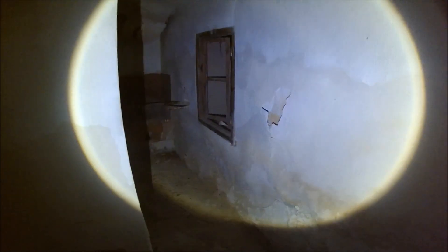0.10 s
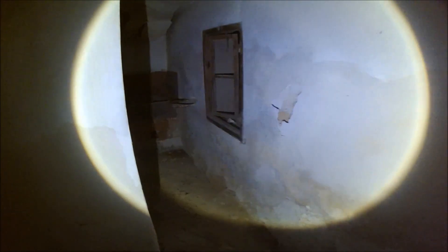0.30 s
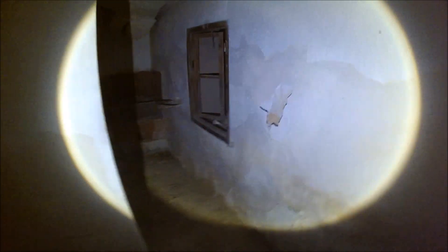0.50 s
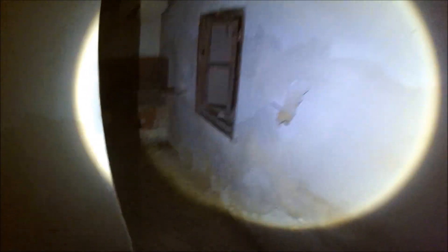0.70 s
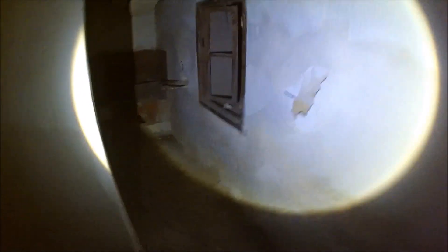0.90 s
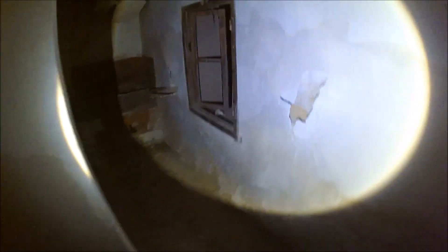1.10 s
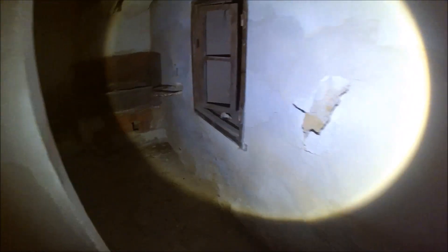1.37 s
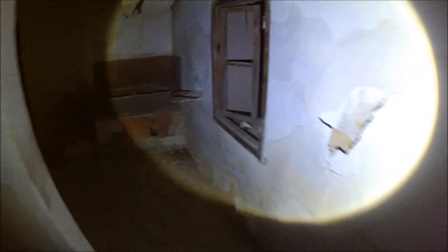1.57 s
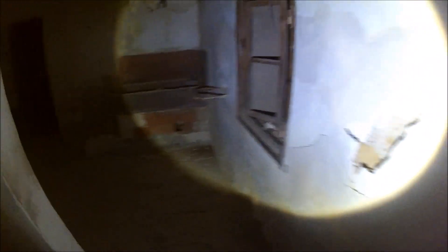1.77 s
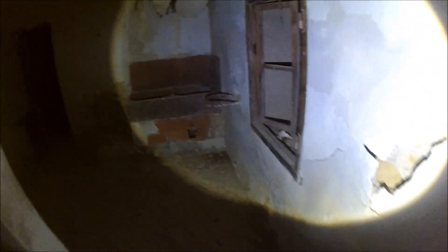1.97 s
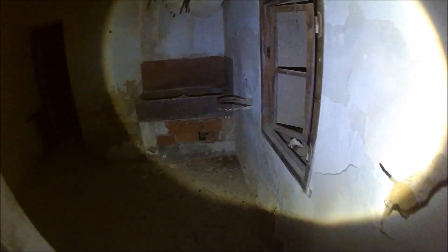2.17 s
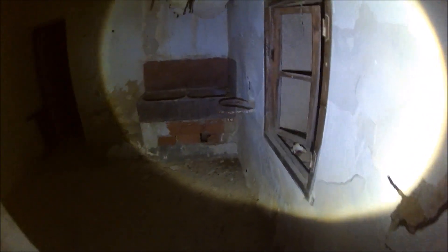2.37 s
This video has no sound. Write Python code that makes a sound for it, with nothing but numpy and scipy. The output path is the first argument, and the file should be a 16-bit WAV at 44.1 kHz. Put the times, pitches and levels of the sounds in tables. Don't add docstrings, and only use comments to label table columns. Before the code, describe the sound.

Footsteps on gritty rubble in a bare room. A small click at 0.1 s, then a loud sharp chip snap at 0.22; grinding and a soft heel from 0.4 to 0.7, a dense bright crunch around 0.8 to 0.95. A near-quiet gap, lighter scrapes and clicks from 1.3 to 1.65, then a brittle crackling step at 2.1 and faint late ticks. Short echo, boxy microphone, faint hiss.

```python
import sys
import numpy as np
from scipy import signal
from scipy.fft import rfft, irfft, next_fast_len
from scipy.io import wavfile
from scipy.ndimage import uniform_filter1d

SR = 44100
rng = np.random.default_rng(int(sys.argv[2]) if len(sys.argv) > 2 else 0)


def to_wav(sig):
    pcm = np.clip(np.atleast_2d(sig), -1, 1) * 32767
    pcm = np.round(pcm).astype(np.int16)
    wavfile.write(sys.argv[1], SR, pcm.T)


def magnitude_from_level(level_db):
    exponent = np.asarray(level_db, float) / 20
    return 10 ** exponent


N = 110250

# freq_hz, density_db_per_hz
AIR_SPECTRUM = [(18, -41.5), (30, -32.5), (562, -17), (655, -19), (1330, -3.5), (1800, -2), (3000, -8),
                (4170, -21), (5800, -39), (7540, -68), (12800, -120)]
# freq_hz, density_db_per_hz
HISS_SPECTRUM = [(5000, -18), (6000, -26), (7000, -13.5), (8000, -19.5), (9000, -11), (10400, -5.5),
                 (13000, -3.5), (15800, -11)]
# freq_hz, gain_db
HOUSING_SPECTRUM = [(60, -55), (400, -28.5), (700, -13.5), (1080, -7.5), (1750, 3.5), (2400, -6),
                    (3600, -11), (4600, -19.5),
                    (5300, -31.5), (6000, -60.5), (7100, -47), (8000, -61.5), (10400, -36), (12500, -42.5),
                     (14600, -39), (16000, -57.5)]
# start_s, level_db, pitch_hz, t60_s
FLOOR_THUDS = [
    (0.553, -70, 84.4, 0.22),
    (0.557, -66.5, 168, 0.34),
    (0.552, -64, 316, 0.31),
    (0.556, -59.5, 517, 0.24),
    (0.68, -80, 86, 0.22),
    (0.822, -83.5, 166, 0.62),
    (1.41, -82.5, 252, 0.96),
    (1.64, -81.5, 210, 0.15),
]
# start_s, peak_db, pitch_hz, t60_s
SLAB_MODES = [(0.1110, -43, 908, 0.033), (0.1120, -79, 174, 0.42), (0.2212, -36, 2524, 0.014),
              (0.2213, -47, 10450, .007), (0.2214, -26, 3600, 0.009), (0.2216, -36, 4300, 0.007),
              (0.2219, -43.5, 595, 0.018), (0.2220, -42, 900, 0.022), (0.3750, -43, 2165, 0.032),
              (0.3760, -61.5, 333, 0.05), (0.5570, -36, 976, 0.021), (0.6000, -41, 974, 0.031),
              (1.3058, -60, 624, 0.027), (1.3059, -44, 2300, 0.016), (1.3060, -47, 2900, .015),
              (1.3061, -51, 3700, .015), (1.3980, -37, 2400, 0.016), (1.4555, -44, 3300, .012),
              (1.5130, -56, 14200, .006), (1.5139, -51, 10520, 0.0052), (1.5140, -42, 2735, 0.014),
              (1.5141, -50, 4030, 0.018), (1.6250, -42.5, 2735, 0.024), (2.0748, -68.5, 10540, .01),
              (2.0940, -43, 2950, 0.015), (2.2380, -64, 4050, .12), (2.2390, -66, 540, .12),
              (2.4135, -46, 2000, .015)]
# start_s, rise_s, hold_s, level_db, brightness_db_per_octave
SOLE_SCUFFS = [(0.0, 0.0042, 0.052, -85.5, -5), (0.104, 0.0017, 0.033, -55, 2.5),
               (0.121, 0.076, 0.014, -51.5, 4), (0.238, 0.013, 0.031, -71.5, 6),
               (0.392, 0.004, 0.085, -62.5, -0.5), (0.454, 0.032, 0.061, -55.5, 4.5),
               (0.552, 0.0079, 0.068, -51.5, 2.5), (0.63, 0.016, 0.1285, -58, -2),
               (0.777, 0.0084, 0.04, -44, 5.5), (0.84, 0.0018, 0.015, -53, 4.0),
               (0.877, 0.014, 0.052, -55.5, 1), (0.94, 0.016, 0.043, -68, -4),
               (1.159, 0.0096, 0.052, -65, 1.5), (1.303, 0.0037, 0.026, -51, -2.5),
               (1.354, 0.023, 0.0062, -57.5, -0.5), (1.393, 0.0023, 0.02, -49.5, -3.5),
               (1.42, 0.0037, 0.052, -50.5, -1), (1.502, 0.0054, 0.053, -56, 0),
               (1.596, 0.0058, 0.096, -59, -2), (2.093, 0.003, 0.05, -54, -2.5),
               (2.302, 0.0026, 0.01, -60, -3), (2.463, 0.0061, 0.025, -72, 13)]
# freq_hz, gain_db
GRIT_TINT = [(900, -0.5), (1700, -0.5), (2200, 5), (2600, -1), (3200, 1.5), (3800, -2), (5000, -2),
             (6000, 2)]
# start_s, peak_db, ring_hz, bright_edge_db, room_share_db
CHIP_SNAPS = [(0.111, -34.5, 1305, -15, -14.5), (0.2221, -14, 1910, -5.5, -32),
              (0.377, -43.5, 1415, -18.5, -9), (0.5575, -35, 1327, -24, -4), (0.6005, -35, 1360, -35, -7),
              (1.306, -37, 1520, -13, -7), (1.398, -35, 1780, -10.5, -7), (1.514, -32.5, 1490, -42, -10.5),
              (1.5975, -28.5, 1420, -38, -10.5), (1.626, -42.5, 2170, -26, -1.5),
              (2.0752, -26.5, 1370, -36, -16.5), (2.0933, -20.5, 1272, -27.5, -13.5),
              (2.3, -47.5, 1390, -9.5, -7)]
# start_s, peak_db, ring_hz, bright_edge_db
GRIT_TICKS = [(0.388, -41, 1400, -4), (0.401, -51, 1800, -6), (0.474, -31, 2230, -28),
              (0.496, -37.5, 2170, -15), (0.51, -30.5, 2880, -38), (0.56, -23, 1300, -19),
              (0.5775, -28.5, 1570, -19), (0.621, -35, 1480, -20), (0.786, -25.5, 1710, -25),
              (0.7925, -25.5, 2170, -11), (0.797, -25, 1650, -9), (0.808, -38, 1670, -15),
              (0.8148, -21.5, 1870, -15), (0.8171, -29.5, 1700, -23), (0.824, -30, 2120, -19),
              (0.829, -44, 2280, -10), (0.8408, -44, 1560, -22), (0.8454, -35, 1830, -7),
              (0.853, -34, 1910, -12), (0.9259, -30, 2200, -25), (0.936, -28, 1276, -13),
              (0.923, -39.5, 1400, -22), (1.189, -39.5, 1280, -19), (1.249, -71, 2020, -20),
              (1.3725, -33, 1900, -16), (1.392, -37, 1500, -13), (1.418, -37, 2020, -16),
              (1.427, -28, 2320, -13), (1.456, -38, 1990, -12), (1.54, -32, 1810, -19),
              (1.641, -32, 1500, -7), (1.739, -38, 1720, -20), (1.905, -48, 1930, -29),
              (1.993, -46, 1840, -14.5), (2.0789, -22, 1350, -26), (2.0974, -26.5, 1485, -33),
              (2.102, -24, 1290, -30), (2.1064, -27, 1230, -31.5), (2.1115, -35, 1380, -30),
              (2.115, -29, 1334, -28), (2.1234, -35.5, 1340, -30), (2.129, -36, 1440, -34),
              (2.138, -31, 1310, -28), (2.158, -38, 1260, -32), (2.169, -33.5, 1380, -23),
              (2.4128, -41, 1360, -32), (2.472, -36, 2240, -27), (2.476, -38.5, 1630, -10)]
# start_s, length_s, depth_db
BAND_DROPOUTS = [(0.052, 0.025, -9), (1.07, 0.0093, -16), (1.146, 0.037, -16), (1.232, 0.021, -9),
                 (2.018, 0.024, -14.5), (2.233, 0.043, -15), (2.297, 0.024, -14), (2.428, 0.016, -10),
                 (2.468, 0.019, -10)]

AIR_DB, AIR_FLICKER_DB = -65.5, 0.8
HISS_DB, WHINE_DB, WHINE_HZ = -86.5, -97, 15714
KEPT_LOW_HZ, KEPT_HIGH_HZ, CUTOFF_HZ = 750, 3900, 16150
ROOM_T60_S, ROOM_GAP_S, ROOM_CUT_HZ = 0.26, 0.0014, 3700
SCUFF_ROOM_DB, SLAB_ROOM_DB, TICK_ROOM_DB = -13.5, -23.5, -10
SCUFF_RELEASE_S = 0.0044
GRAINS_PER_S, GRAIN_SPREAD_DB, GRAIN_CLUMP_DB, GRIT_PATCHY_DB = 9000, 2.5, 1.5, 1.6
SPARKLE_DB_PER_DB, SPARKLE_FROM_DB = 0.4, -47.5
TICK_GAIN_DB = -11.5
CHIP_DIE_CYCLES, CHIP_SECOND_DB, CHIP_LOW_CUT_RATIO = 0.67, -15.5, 0.72
CHIP_LEAD_S, CHIP_SCATTER_S, EDGE_CUT_HZ = 0.0011, 0.0015, 10500
BOUNCE_S, BOUNCE_DB = 0.0036, -16
CHIP_SAMPLES = 2048


def rms_one(x):
    return x / np.sqrt(np.mean(x ** 2) + 1e-20)


def butter(x, order, hz, kind="low"):
    return signal.sosfilt(signal.butter(order, hz, kind, fs=SR, output="sos"), x)


def colour(x, points):
    size = next_fast_len(N + 8192)
    size += size % 2
    hz, db = np.transpose(points)
    bin_hz = np.arange(size // 2 + 1) * SR / size
    log_gain = np.interp(np.log(bin_hz + 1), np.log(hz), db) * np.log(10) / 20
    cepstrum = irfft(log_gain, size)
    cepstrum[1:size // 2] *= 2
    cepstrum[size // 2 + 1:] = 0
    return irfft(rfft(x, size) * np.exp(rfft(cepstrum)), size)[..., :N]


def drift(rate_hz):
    r = np.exp(-2 * np.pi * rate_hz / SR)
    wander = signal.lfilter([1], [1, -2 * r, r * r], rng.standard_normal(N + SR))
    return rms_one(wander[SR:])


def housing(x):
    return colour(x, HOUSING_SPECTRUM)


def night_air():
    air = rms_one(colour(rng.standard_normal(N), AIR_SPECTRUM))
    return air * magnitude_from_level(AIR_DB + AIR_FLICKER_DB * drift(6))


def room(x):
    t = np.arange(SR) / SR
    tail = rng.standard_normal(SR) * magnitude_from_level(-60 * t / ROOM_T60_S) * (t > ROOM_GAP_S)
    tail = butter(tail, 1, ROOM_CUT_HZ)
    return signal.fftconvolve(x, tail / np.sqrt(np.sum(tail ** 2)))[:N]


def floor_thuds():
    t = np.arange(N) / SR
    out = np.zeros(N)
    for start_s, level_db, hz, t60_s in FLOOR_THUDS:
        rumble = rms_one(butter(rng.standard_normal(N), 2, [hz * 0.97, hz * 1.45], "band"))
        age = np.maximum(t - start_s, 0)
        out += rumble * magnitude_from_level(level_db - 60 * age / t60_s) * (1 - np.exp(-age / 0.0073))
    return out


def slab_rings():
    t = np.arange(N) / SR
    out = np.zeros(N)
    for start_s, peak_db, hz, t60_s in SLAB_MODES:
        age = np.maximum(t - start_s, 0)
        onset = (1 - np.exp(-age * hz)) ** 2
        out += magnitude_from_level(peak_db - 60 * age / t60_s) * np.sin(2 * np.pi * hz * age) * onset
    return out


def grit_bands():
    size_db = GRAIN_SPREAD_DB * np.minimum(rng.exponential(1, N), 3)
    sizes = magnitude_from_level(size_db) * rng.choice([-1, 1], N)
    struck = rng.random(N) < GRAINS_PER_S / SR
    grains = sizes * struck * magnitude_from_level(GRAIN_CLUMP_DB * np.tanh(drift(110)))
    rest = rms_one(colour(housing(grains), GRIT_TINT))
    bands = []
    for hz in (1150, 1600, 2300, 3300, 7000):
        low = signal.sosfiltfilt(signal.butter(4, hz, fs=SR, output="sos"), rest)
        bands.append(low)
        rest = rest - low
    return np.array([band * magnitude_from_level(GRIT_PATCHY_DB * drift(25)) for band in bands + [rest]])


def scuffs():
    t = np.arange(N) / SR
    bands = grit_bands()
    octaves = np.log2(np.array([700, 1350, 1900, 2800, 3600]) / 1900)
    out = np.zeros(N)
    for start_s, rise_s, hold_s, level_db, tilt_db in SOLE_SCUFFS:
        rise = np.clip((t - start_s) / rise_s, 0, 1) ** 2
        released_s = np.maximum(t - start_s - rise_s - hold_s, 0)
        press = rise * np.exp(-released_s / SCUFF_RELEASE_S)
        sparkle_db = SPARKLE_DB_PER_DB * (level_db - SPARKLE_FROM_DB)
        band_gain = magnitude_from_level(np.append(tilt_db * octaves, sparkle_db))
        out += magnitude_from_level(level_db) * press * (band_gain @ bands)
    return out


def chips():
    ticks = [(s, db + TICK_GAIN_DB, hz, edge_db, TICK_ROOM_DB) for s, db, hz, edge_db in GRIT_TICKS]
    pulse = housing(np.arange(N) == 0)[:CHIP_SAMPLES]
    t = np.arange(CHIP_SAMPLES) / SR
    near, far = np.zeros(N + CHIP_SAMPLES), np.zeros(N + CHIP_SAMPLES)
    edge = butter(t == 0, 2, [3000, EDGE_CUT_HZ], "band")
    for start_s, peak_db, hz, edge_db, room_db in [*CHIP_SNAPS, *ticks]:
        second_hz = hz * rng.uniform(1.77, 1.9)
        age = t * hz / CHIP_DIE_CYCLES
        rings = np.sin(2 * np.pi * hz * t) + magnitude_from_level(CHIP_SECOND_DB) * np.sin(2 * np.pi * second_hz * t)
        body = age ** 2 * np.exp(-age) * rings
        snap = signal.fftconvolve(body + 20 * magnitude_from_level(edge_db) * edge, pulse)[:CHIP_SAMPLES]
        snap = butter(snap, 4, CHIP_LOW_CUT_RATIO * hz, "high")
        snap *= magnitude_from_level(peak_db) / np.abs(snap).max()
        snap += magnitude_from_level(BOUNCE_DB) * np.interp(t - BOUNCE_S, t, snap, left=0)
        crumbs = rng.standard_normal(CHIP_SAMPLES) * np.exp(-t / CHIP_SCATTER_S)
        crumbs = butter(crumbs, 2, [hz * 0.73, hz * 1.088], "band")
        crumbs = signal.fftconvolve(crumbs, pulse)[:CHIP_SAMPLES]
        i = int((start_s - CHIP_LEAD_S) * SR)
        near[i:i + CHIP_SAMPLES] += snap
        far[i:i + CHIP_SAMPLES] += rms_one(crumbs) * np.sqrt(np.mean(snap ** 2)) * magnitude_from_level(room_db)
    return near[:N], far[:N]


def scene():
    near, far = chips()
    scuff = scuffs()
    rings = slab_rings()
    to_room = far + magnitude_from_level(SCUFF_ROOM_DB) * scuff + magnitude_from_level(SLAB_ROOM_DB) * rings
    mix = near + scuff + rings + room(to_room) + floor_thuds() + night_air()
    return mix[None]


def low_pass(x):
    return signal.sosfilt(signal.butter(12, 15890, fs=SR, output="sos"), x)


def record(dry):
    t = np.arange(N) / SR
    hiss = rms_one(colour(rng.standard_normal(N), [(2500, -41), *HISS_SPECTRUM]))
    x = dry + magnitude_from_level(HISS_DB) * hiss
    middle = signal.butter(6, [KEPT_LOW_HZ, KEPT_HIGH_HZ], "band", fs=SR, output="sos")
    kept = signal.sosfiltfilt(middle, x)
    loss_db = np.zeros(N)
    for start_s, length_s, depth_db in BAND_DROPOUTS:
        loss_db += depth_db * ((t > start_s) & (t < start_s + length_s))
    x = kept + (x - kept) * magnitude_from_level(uniform_filter1d(loss_db, size=200))
    whine = np.sqrt(2) * np.sin(2 * np.pi * WHINE_HZ * t + 1.5 * drift(5))
    x = x + magnitude_from_level(WHINE_DB) * whine
    x = signal.sosfilt(signal.cheby2(16, 50, CUTOFF_HZ, fs=SR, output="sos"), x)
    return low_pass(x)


dry = scene()
out = record(dry)
to_wav(out)
```